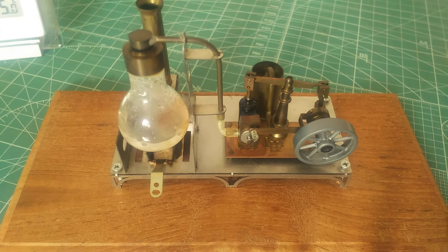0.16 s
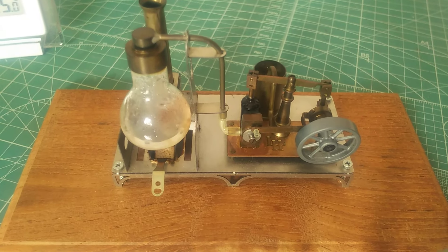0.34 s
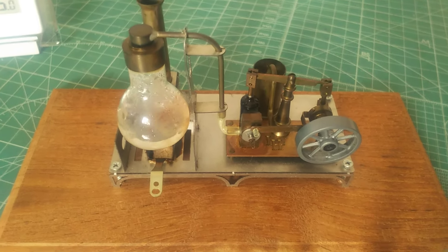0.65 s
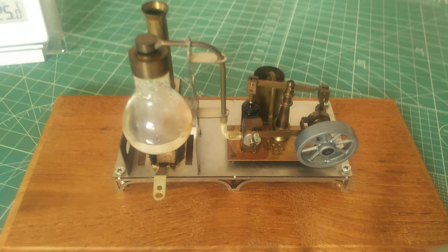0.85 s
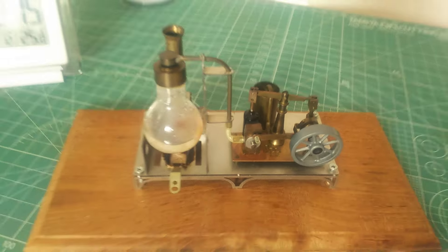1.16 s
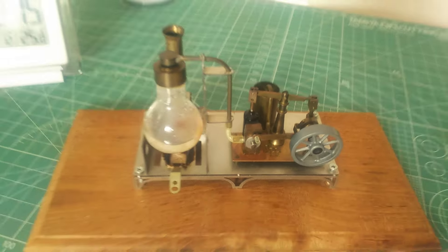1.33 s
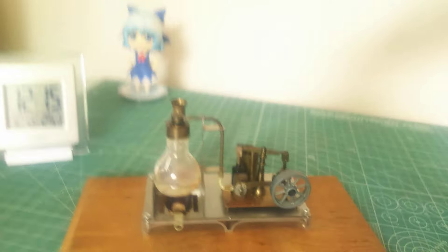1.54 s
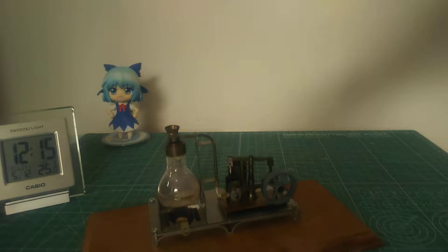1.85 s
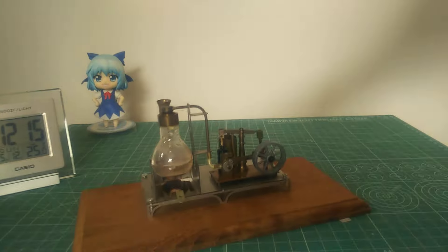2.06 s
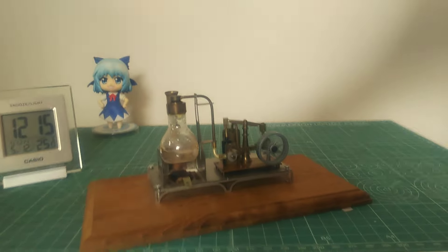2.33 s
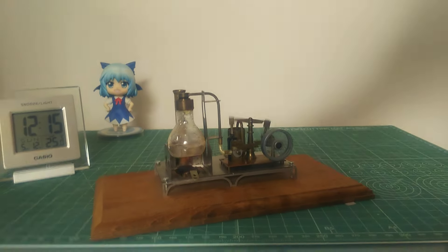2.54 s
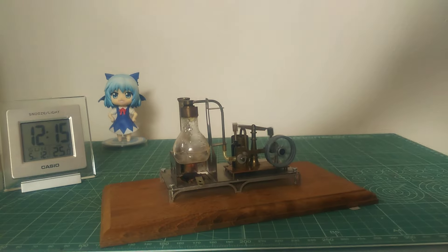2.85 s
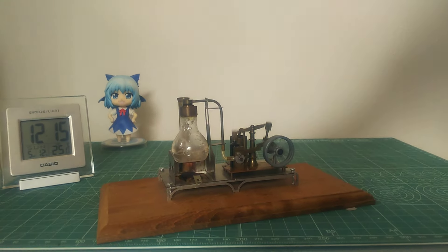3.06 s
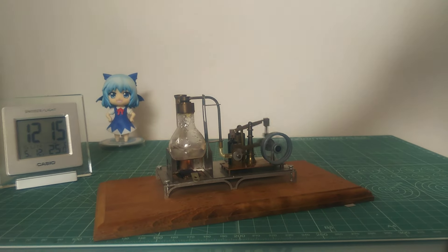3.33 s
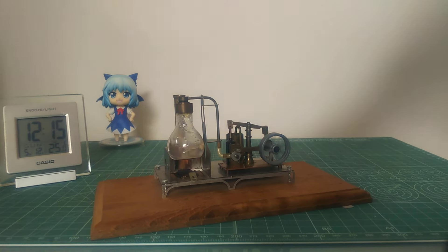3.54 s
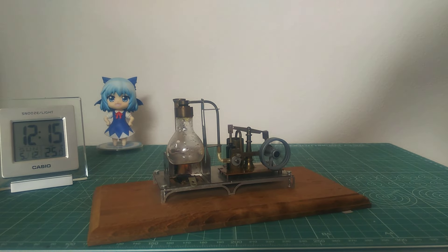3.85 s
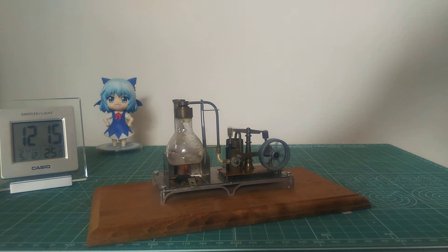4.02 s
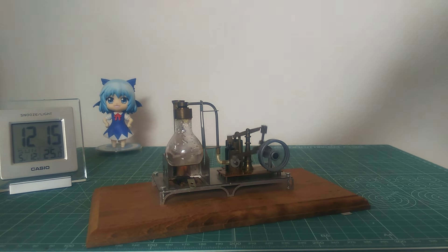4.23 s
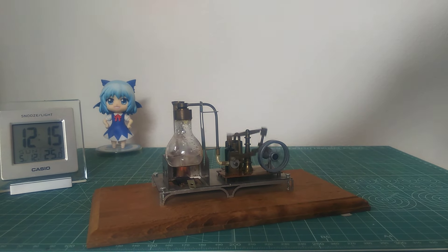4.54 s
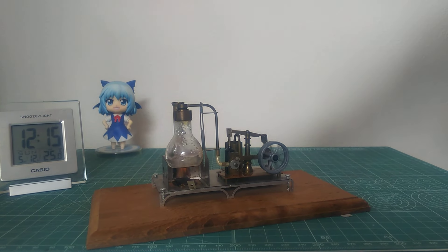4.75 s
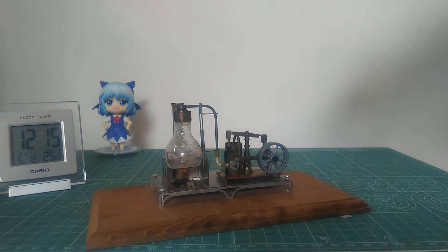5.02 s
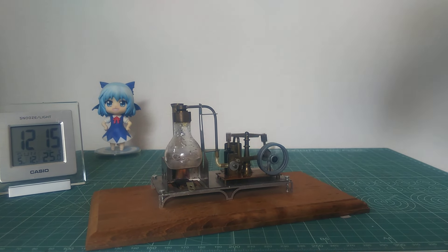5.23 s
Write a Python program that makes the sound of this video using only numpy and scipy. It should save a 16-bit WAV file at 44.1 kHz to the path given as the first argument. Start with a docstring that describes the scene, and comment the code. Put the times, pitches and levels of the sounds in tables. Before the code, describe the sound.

After soft handling and hard clicks in a quiet room, a tiny mechanism starts with scrapes and ticks rapidly, stalls once and carries on slightly slower.

```python
"""Small ticking mechanism, close by

In a quiet room: soft handling, creaks and hard clicks, struck as damped rings with a crack of noise.
Then a small mechanism runs at about seven cycles a second, among stray clicks: a sharp tick that bounces once, beats
of gritty filtered noise with a thin hiss, thuds and chatter. It scrapes at first, takes dull knocks, slows and stalls
once. The right microphone port hears mostly a hard ring near 3.7 kHz, the left one the hiss."""
import sys
import numpy as np
from scipy import signal
from scipy.fft import rfft, irfft
from scipy.io import wavfile

SR = 44100
rng = np.random.default_rng(int(sys.argv[2]) if len(sys.argv) > 2 else 0)


def bounce(signal):
    """Save signal as a 16-bit WAV file at the path given by the first command-line argument."""
    frames = np.transpose(np.atleast_2d(signal))
    limited = np.clip(frames, -1, 1)
    pcm = np.round(limited * 32767).astype(np.int16)
    wavfile.write(sys.argv[1], SR, pcm)


N = 237566
TIME = np.arange(N) / SR
TOP_HZ = 14000

# rings of the case under a hard blow: ring_hz, relative_db, t60_s
CASE = [(448, 0, 0.025), (772, 3.5, 0.046), (970, 11, 0.013), (1724, 9, 0.0055), (2210, -2.5, 0.013),
        (3005, -17.5, 0.042), (3350, 0, 0.017), (3706, 13, 0.011), (5580, 3.5, 0.0056), (7260, -1.5, 0.011),
        (9100, -16, 0.0078)]
# cycles of the mechanism: tick_start_s, force_db, opening_tick_db
CYCLES = [(2.1322,.5,-34.5), (2.2492,1.5,-32), (2.388,5,-39.5), (2.5198,1,-34), (2.6493,0.5,-31.5),
          (2.783,-0.5,-44), (2.915,.5,-53), (3.061,5,-55), (3.221,6,-40), (3.338,-0.5,-64), (3.486,0.5,-60),
          (3.634,0,-53), (3.784,0,-47), (3.937,1,-48), (4.077,1,-38.5), (4.2239,1,-37.5), (4.3649,0.5,-33),
          (4.5135,-0.5,-45.5), (4.6753,0,-36.5), (4.9325,-0.5,-34.5), (5.1013,0,-34.5), (5.2675,0.5,-36)]
# colour of the frame as gain on white noise: corner_hz, left_db, right_db
FRAME = [(37.7,-47,-37), (97,-33,-34), (313,-32.5,-32.5), (368,-49,-38), (452,-29.5,-36), (705,-40,-37.5),
         (990,-39.5,-41.5), (1520,-42,-43), (2570,-44.5,-42), (3600,-59.5,-33.5), (4630,-49.5,-45.5),
         (7250,-48.5,-57.5), (10000,-56.5,-77), (11430,-48,-97), (15000,-77.5,-83)]


def undb(db):
    """Decibels to gain."""
    return 10 ** (np.asarray(db) / 20)


def panned(db):
    """Left and right gains for a level difference, left over right."""
    return undb(db * np.array([[.5], [-.5]]))


def add(out, s, x):
    """Mix a sound in from time s on."""
    i = int(s * SR)
    out[..., i:i + x.shape[-1]] += x[..., :max(N - i, 0)]


def cut(x, hz, kind, order=3):
    """Butterworth filter."""
    return signal.sosfilt(signal.butter(order, hz, kind, fs=SR, output="sos"), x)


def colour(x, points):
    """Causal minimum-phase filter through (Hz, dB) points, by folding the cepstrum."""
    size = 4096
    hz, db = np.transpose(points)
    grid = np.maximum(np.arange(size // 2 + 1) * SR / size, 1)
    gain = undb(np.interp(np.log(grid), np.log(hz), db))
    cepstrum = irfft(np.log(gain))
    cepstrum[1:size // 2] *= 2
    cepstrum[size // 2 + 1:] = 0
    impulse = irfft(np.exp(rfft(cepstrum)))
    return signal.oaconvolve(x, impulse)[:len(x)]


def ports(x, table):
    """Each microphone port has its own colour."""
    return np.array([colour(x[c], np.array(table)[:, [0, c + 1]]) for c in range(2)])


def air(shared_hz):
    """White noise at two ports, alike in the bass and largely unrelated above."""
    mid, side = rng.standard_normal((2, N))
    side = cut(side, shared_hz, "high", order=1) + 0.18 * side
    mid = mid + 0.12 * cut(mid, shared_hz, "low", order=1)
    return (mid + side * np.array([[1], [-1]])) / np.sqrt(2)


def ring(modes, t):
    """Damped sines of a struck part, a little different in pitch on every blow."""
    out = 0
    for hz, db, t60 in modes:
        struck_hz = hz + 0.74 * rng.standard_normal() / t60
        decay = np.exp(-np.log(1000) * t / t60)
        out = out + undb(db) * decay * np.sin(2 * np.pi * struck_hz * t)
    return out


def resonate(x, rings):
    """Narrow resonances ring on top of a sound."""
    out = x
    for hz, width, db in rings:
        out = out + undb(db) * signal.lfilter(*signal.iirpeak(hz, hz / width, fs=SR), x)
    return out


def swell(rise, fall):
    """A contact that builds up smoothly, then dies away."""
    t = TIME[:SR // 2]
    return np.sin(np.pi / 2 * np.minimum(t / rise, 1)) ** 2 * np.exp(-np.maximum(t - rise, 0) / fall)


def grit(rate_hz, spread_db):
    """Stick and slip: the force jumps to a random value many times a second."""
    steps = rng.standard_normal(N // 8)[(TIME * rate_hz).astype(int)]
    force = undb(spread_db * steps)
    return force / np.sqrt(np.mean(force ** 2))


def blow(modes, band_db, band_pan_db, snap, crack, crack_s, tail_db, tail_s, low_hz):
    """The snap of contact, modes, a brief crack and a faint tail; the spot that is struck weights four bands."""
    # edges between the body, clack, ring and top bands: edge_hz
    splits_hz = [1174, 2410, 4600]
    t = TIME[:SR // 6]
    spray = np.exp(-t / crack_s) * crack + undb(tail_db) * np.exp(-t / tail_s)
    x = snap * (t == 0) + ring(modes, t) + spray * rng.standard_normal((2, len(t)))
    x[1] = cut(x[1], 7100, "low")  # the right port is deaf to the highest treble
    edges, out = [low_hz, *splits_hz, TOP_HZ], 0
    for k in range(4):
        band = cut(x, edges[k:k + 2], "band", order=4)
        sides = panned(band_pan_db[k])
        # rms as if the whole band fell within 10 ms
        rms = np.sqrt(np.sum(band ** 2, axis=1, keepdims=True) / (SR / 100))
        out = out + band / rms * undb(band_db[k]) * sides / np.sqrt(np.mean(sides ** 2))
    return out


def room():
    """Quiet room rumble and microphone hiss: coloured noise set to one overall level."""
    # colour of the empty room: corner_hz, relative_db
    room_colour = [(15, -52), (25, -32), (37, -1), (59, -2.5), (128, -13), (637, -20.5), (709, -21.5),
                   (854, -22.5), (977, -22.5), (1620, -23.5), (2070, -23), (2630, -24.5), (4610, -25.5),
                   (13400, -39), (15000, -66)]
    level_db = -63.5
    x = np.array([colour(side, room_colour) for side in air(shared_hz=650)])
    return x * undb(level_db) / np.std(x.mean(axis=0))


def rubs():
    """Soft, dull rubbing that sounds only the low resonance of the frame."""
    # a hand shifts softly before the first click: start_s, rise_s, fall_s, force_db
    hand_shifts = [(.475,0.023,.035,-43), (.74,0.24,0.14,-44.5)]
    # limits of the low resonance: edge_hz
    band_hz = [390, 540]
    force = np.zeros(N)
    for s, rise, fall, db in hand_shifts:
        add(force, s, undb(db) * swell(rise, fall))
    return cut(air(shared_hz=900) * force, band_hz, "band", order=2)


def rustle():
    """A faint creaking rub among the first clicks, and soft bumps of handling under them."""
    # lower ring of each bump: start_s, ring_hz, level_db, t60_s
    soft_bumps = [(1.017,76,-51.5,0.1), (1.38,71,-68,0.19), (1.667,91.5,-54,0.072), (1.744,63,-56,0.27),
                  (1.825,89.5,-67,0.11), (1.876,105,-56,.15), (1.917,81,-60,0.23)]
    force, bumps = np.zeros(N), np.zeros(N)
    add(force, 1.375, undb(-5) * swell(0.0029, 0.19))
    add(force, 1.73, undb(-13.5) * swell(0.017, 0.67))
    for s, hz, db, t60 in soft_bumps:
        modes = [(hz, db, t60), (2.12 * hz, db + 6.5, t60 / 2)]
        add(bumps, s, ring(modes, TIME[:SR // 3]))
    rub = air(shared_hz=596) * force * grit(rate_hz=180, spread_db=6.0)
    return cut(ports(rub, FRAME), 5100, "low") + bumps


def click(db, hz, clack_db, pan_db):
    """One hard blow on the case; a harder one is brighter, and force and clack set the four bands."""
    # body, clack, ring and top bands: normal_db, db_per_db_of_force, share_of_clack, share_of_pan
    bands = [(-49,0.8,0.44,0.36), (-42,1,1,0.32), (-41.5,1,0.055,1.54), (-47,1.703,1,0.53)]
    normal_force_db = -40
    normal_db, per_force, clack_share, pan_share = np.transpose(bands)
    band_db = normal_db + per_force * (db - normal_force_db) + clack_share * clack_db
    return blow([(hz, 9, .008), *CASE], band_db, pan_share * pan_db, snap=20.4, crack=3.9,
                crack_s=0.00094, tail_db=-37, tail_s=0.012, low_hz=104)


def creaks():
    """A surface sticks and slips, each slip after a longer gap and, but for some scatter, weaker."""
    # runs of small slips: start_s, slip_count, first_gap_s, first_force_db, clack_db
    runs = [(1.3295,3,.0071,-46,-17), (1.3953,9,.0118,-48.5,-16.5), (1.775,3,0.021,-59,2.5),
            (2.090,3,0.012,-56,-0.5)]
    slowing = 1.5  # each gap over the one before
    fade_db_per_s, scatter_db = 70, 1.2
    out = np.zeros((2, N))
    for start, slips, gap, db, clack_db in runs:
        lag = 0
        for _ in range(round(slips)):
            slip_db = db - fade_db_per_s * lag + scatter_db * rng.standard_normal()
            add(out, start + lag, click(slip_db, 3100, clack_db, pan_db=-15))
            lag += gap
            gap *= slowing
    return out


def clicks():
    """Hard clicks on the case: handling at first, then stray clicks while the mechanism runs."""
    # blows on the case: start_s, force_db, spot_hz, clack_db, pan_db (left over right, before band shares)
    case_clicks = [(1.0165,-33.5,2940,-22.5,-6.5), (1.6677,-47,3000,-4.5,-10), (1.7426,-45,3000,-5.5,-8),
                   (1.8253,-21.5,3350,-21.5,-28), (1.875,-36.5,2940,3.5,-11), (1.9184,-20,3200,-16.5,-24),
                   (1.985,-56.5,3600,-5,-14), (1.999,-36,3100,-2.5,-34), (2.0056,-45,3100,-4,-32),
                   (2.0642,-41.5,4000,-29,-11), (2.072,-40,4000,1.5,-43), (2.1481,-26.5,4000,-21,-14),
                   (2.5394,-35.5,3900,-17,-9), (3.013,-41.5,3700,-13,-13), (3.159,-32,3800,-11,-7),
                   (3.2442,-27,3800,-26,-14), (3.39,-39,3830,-17,-11), (3.6617,-37.5,3850,-11,-29),
                   (3.801,-36.5,3300,-12,-9), (4.1069,-44,3760,-20,-12)]
    out = np.zeros((2, N))
    for s, db, hz, clack_db, pan_db in case_clicks:
        add(out, s, click(db, hz, clack_db, pan_db))
    return out


def knocks():
    """Dull knocks: one strong low ring over the shared rings of the base, brighter when harder."""
    # the blows: start_s, lowest_strong_ring_hz, its_t60_s, level_db, hardness_db
    dull_blows = [(2.2306,830,0.015,-46,4.5), (2.3824,1140,0.0058,-42.5,4.5), (2.787,705,0.047,-39,-4),
                  (2.9117,858,0.064,-29.5,-3.5), (2.975,700,0.057,-44.5,-4.5), (3.0914,684,0.018,-36.5,0),
                  (3.163,1020,0.012,-40.5,6.5), (3.2354,880,0.038,-36.5,-3), (3.272,890,0.016,-27.5,1.5),
                  (3.502,1470,0.0087,-52.5,4), (4.306,1580,0.024,-53.5,3.5)]
    # rings of the base in every knock: ring_hz, relative_db, t60_s
    base = [(424,-50,0.057), (700,0,0.024), (1306,1,0.0073), (1793,-0.5,0.021), (2960,-15,0.058),
            (3656,-2.5,0.029), (3856,2.5,0.032), (5150,-26,0.0076), (7660,-27,.01)]
    # body, clack, ring and top bands: relative_db, db_per_db_of_hardness, left_over_right_db
    bands = [(-0.2,-0.08,4.5), (0.7,0.5,-1), (-1.5,2.1,-15), (-28.5,4.26,6)]
    out = np.zeros((2, N))
    relative_db, per_hardness, band_pan_db = np.transpose(bands)
    for s, hz, t60, db, hardness_db in dull_blows:
        band_db = db + relative_db + per_hardness * hardness_db
        add(out, s, blow([(hz, 6, t60), *base], band_db, band_pan_db, snap=12.5, crack=4,
                         crack_s=0.0012, tail_db=-6.5, tail_s=0.027, low_hz=373))
    return out


def scrapes():
    """Dry surfaces drag over each other: noise broken up by fast stick and slip."""
    # drags, nearly all while it gets going: start_s, rise_s, fall_s, force_db
    drags = [(2.143, 0.005, 0.0035, 1), (2.156, 0.0055, 0.04, -13), (2.184, 0.0063, 0.0041, -11),
             (2.222, 0.0027, 0.0033, -4), (2.267, 0.0098, 0.022, 2), (2.401, 0.012, 0.031, -4),
             (2.536, 0.002, 0.0087, -3.5), (2.667, 0.0012, 0.0029, -7), (3.159, .005, .005, -33)]
    # colour of the scrape as gain on noise: corner_hz, left_db, right_db
    scrape_colour = [(500, -25, -38), (1180, -32, -25), (2140, -21.5, -22.5), (4000, -34, -16),
                     (5500, -23, -29), (7050, -19, -29), (9100, -28, -45), (11800, -30.5, -70),
                     (14500, -55, -46)]
    force = np.zeros(N)
    for s, rise, fall, db in drags:
        add(force, s, undb(db) * swell(rise, fall))
    dragging = air(shared_hz=500) * force * grit(rate_hz=1400, spread_db=4.0)
    return cut(ports(dragging, scrape_colour), 270, "high")


def cycles():
    """For each cycle: start, spread of the beats, and dB of body, rasp, hiss and last beat, from force and length."""
    # extra rasp, high as the mechanism starts and as it slows: time_s, extra_db
    extra_rasp = [(2.13,4.5), (2.39,5), (2.7,2), (4.7,2.1), (5.1,4.5), (5.27,8)]
    lead_s = .006  # the cycle starts this long before its tick
    period_s, slowest_s, stretch = .148, .172, .38  # spread: (length / period) ** stretch
    start, force_db, _ = np.transpose(CYCLES)
    length = np.minimum(np.diff(start, append=np.inf), slowest_s)
    rasp_db = force_db + np.interp(start, *np.transpose(extra_rasp))
    hiss_db = .5 * force_db + 1.5 - 1.46 * (start - start[0])  # the hiss fades over the run
    # the last beat fades when a cycle outlasts the period, and does not follow the force
    last_db = 4 - 305 * np.maximum(length - period_s, 0) - force_db
    return zip(start - lead_s, (length / period_s) ** stretch, force_db, rasp_db, hiss_db, last_db)


def chatter():
    """Tiny random ticks of loose parts, each at its own pitch, crowded early in every cycle."""
    out, t = np.zeros((2, N)), TIME[:SR // 20]
    for start, pace, _, rasp_db, _, _ in cycles():
        for when, pitch, size in rng.random(size=(6, 3)):
            hz = 1800 * 2 ** (1.5 * pitch)
            modes = [(hz, 0, .012), (1.31 * hz, -3, .009), (3600, -5, .015), (2.06 * hz, -9, .006)]
            level = undb(rasp_db - 58.5 + 12.2 * size)
            add(out, start + pace * (0.011 + 0.091 * when ** 2), panned(2) * level * ring(modes, t))
    return out


def ticks():
    """A loose joint snaps over as each cycle opens, and bounces once."""
    # body, clack, ring and top bands: relative_db, left_over_right_db
    bands = [(-19,1), (-27.5,-7), (-2.5,-14.5), (-23,18)]
    bounce_s, bounce_db = .0098, -4
    out = np.zeros((2, N))
    band_db, band_pan_db = np.transpose(bands)
    for start, _, tick_db in CYCLES:
        for lag, db in [(0, tick_db), (bounce_s, tick_db + bounce_db)]:
            add(out, start + lag, blow(CASE, db + band_db, band_pan_db, snap=2.6, crack=.96,
                                       crack_s=0.0046, tail_db=-2, tail_s=0.011, low_hz=234))
    return out


def mechanism():
    """Every cycle repeats the same beats: thuds, a gritty rasp in the frame and a hiss."""
    # rubbing beats, lags at normal pace: lag_s, rise_s, fall_s, body_db, rasp_db, hiss_db
    beats = [(-.004,0.0061,0.022,2,-1.5,4.5), (0.017,0.0051,0.057,-1.5,3,4.5),
             (0.028,0.0096,0.0022,7.5,2.5,8), (0.061,0.0049,0.018,3.5,-5,-3),
             (0.065,.006,0.0019,-19,-11,11.5), (.086,0.0076,0.017,-1,-15,-1), (0.1,0.0061,0.018,3,-0.5,1)]
    # rings the beats set off, lags at normal pace: lag_s, ring_hz, level_db, t60_s, left_over_right_db
    thud_rings = [(.006,123,-49,0.073,-5), (0.031,106,-49,0.14,2), (.033,190.5,-45,0.14,0.5),
                  (.033,985,-46,0.044,0), (.067,579.5,-47,0.1,2), (0.069,11320,-56.5,0.0032,35),
                  (.103,112,-46.5,.09,1), (.105,302,-51,0.12,3), (.105,452,-44.5,0.061,11),
                  (0.109,4570,-45.5,0.019,-3)]
    # narrow frame resonances at the left port: ring_hz, width_hz, over_broad_colour_db
    left_rings = [(479,21,3), (605.5,6.1,6), (1055,15,-6.5), (3160,25,20), (3500,62,22), (5190,85,7),
                  (5930,25,-5), (5900,25,-9), (6800,32,2), (6800,25,0), (7470,24,6)]
    # narrow frame resonances at the right port: ring_hz, width_hz, over_broad_colour_db
    right_rings = [(790,51,2.5), (1170,15,5), (1270,97,0.5), (1760,35,-4), (1978,61,9), (3500,22,-11),
                   (3350,11,6.5), (3670,29,3), (3500,40,-2), (3914,61,4)]
    power, thuds, t = np.zeros((3, N)), np.zeros((2, N)), TIME[:SR // 8]
    last_beat_s = .095  # later lags belong to the last beat
    for start, pace, *cycle_db, last_db in cycles():
        for lag, rise, fall, *beat_db in beats:
            db = np.array(beat_db) + cycle_db + last_db * (lag > last_beat_s)
            db = db + 0.31 * rng.standard_normal(3)
            add(power, start + lag * pace, (undb(db)[:, None] * swell(rise, fall)) ** 2)
        for lag, hz, db, t60, pan in thud_rings:
            db = db + cycle_db[0] + last_db * (lag > last_beat_s) + 0.74 * rng.standard_normal()
            # a soft contact takes about one period to build the ring up
            build_up = 1 - np.exp(-t * hz / 0.51)
            add(thuds, start + lag * pace, panned(pan) * ring([(hz, db, t60)], t) * build_up)
    body, rasp, hiss = np.sqrt(power)
    rubbing = grit(rate_hz=310, spread_db=0.5)  # shared by rasp and hiss
    low = cut(air(shared_hz=520) * body * grit(rate_hz=350, spread_db=3.0), 1590, "low")
    rasping = air(shared_hz=450) * rasp * rubbing * grit(rate_hz=290, spread_db=4.0)
    mid = cut(rasping, [2400, 5200], "band")
    top = cut(air(shared_hz=450) * hiss * rubbing, 5970, "high")
    left, right = ports(undb(-1.33) * low + undb(-2.5) * mid + undb(-1.0) * top, FRAME)
    return np.array([resonate(left, left_rings), resonate(right, right_rings)]) + thuds


def scene():
    """All sources, with a faint return from the walls and the room underneath."""
    contacts = rubs() + rustle() + creaks() + clicks() + knocks()
    dry = contacts + scrapes() + chatter() + ticks() + mechanism()
    t = TIME[:SR // 3]
    decay = np.exp(-np.log(1000) * t / 0.16)  # t60 0.16 s
    walls = cut(rng.standard_normal((2, len(t))), 4000, "low", order=1) * decay
    walls = walls / np.sqrt(np.sum(walls ** 2) / 2)
    wet = signal.oaconvolve(dry.mean(axis=0)[None], walls, axes=1)[:, :N]
    return dry + undb(-29.5) * wet + room()


def record(dry):
    """The recorder cuts the deepest bass and the top."""
    no_rumble = cut(dry, 42, "high", order=4)
    return signal.sosfilt(signal.ellip(8, .2, 70, TOP_HZ, fs=SR, output="sos"), no_rumble)


dry = scene()
out = record(dry)
bounce(out)
```